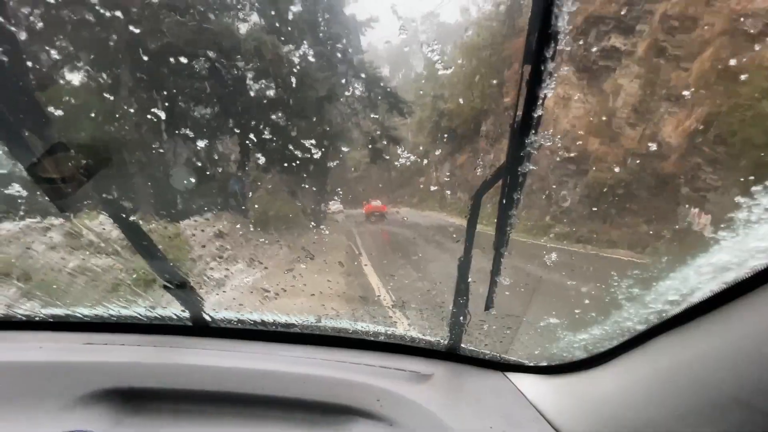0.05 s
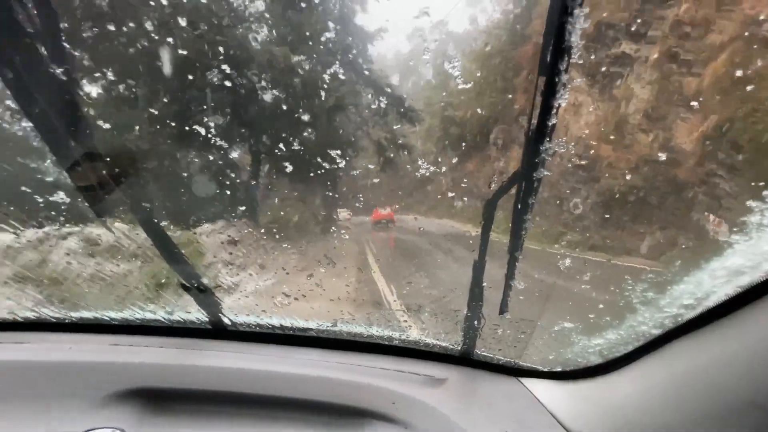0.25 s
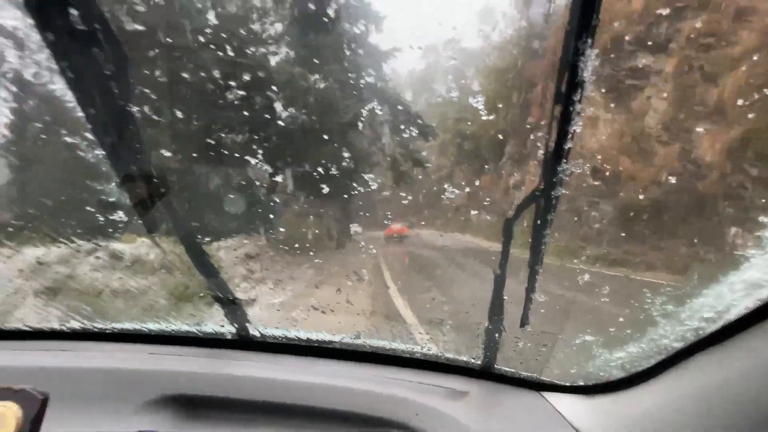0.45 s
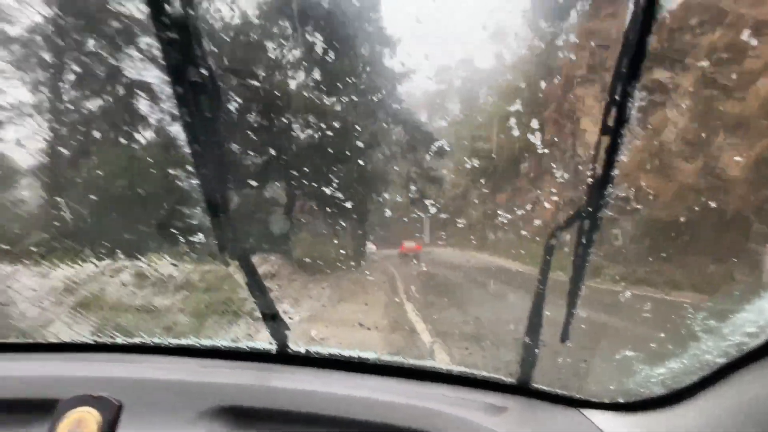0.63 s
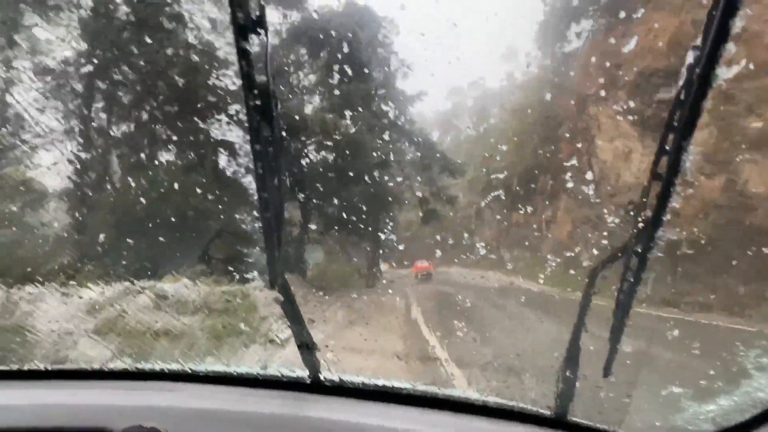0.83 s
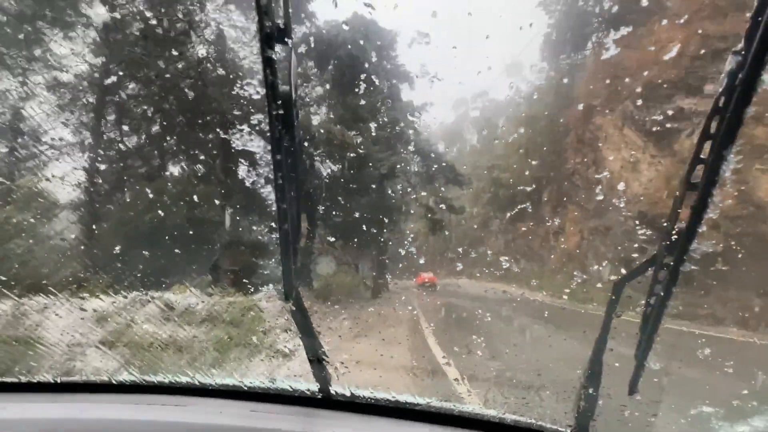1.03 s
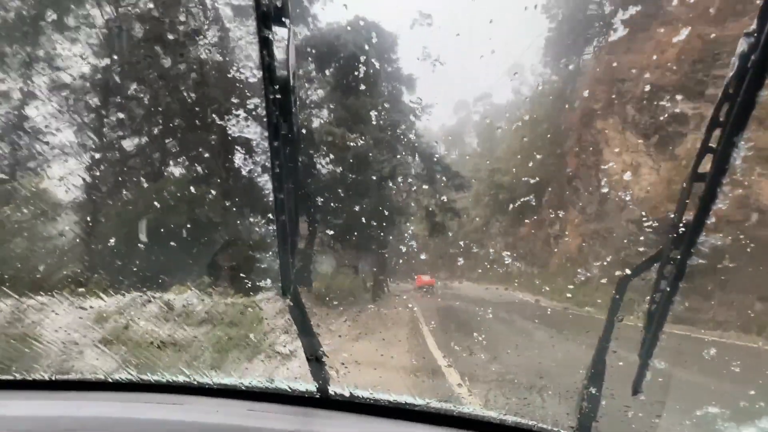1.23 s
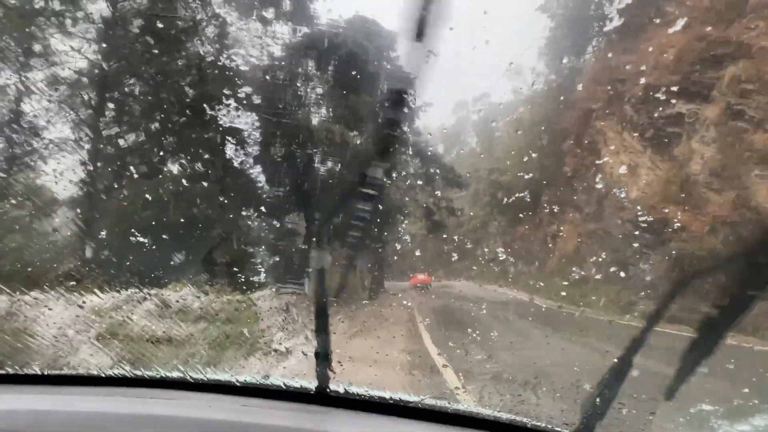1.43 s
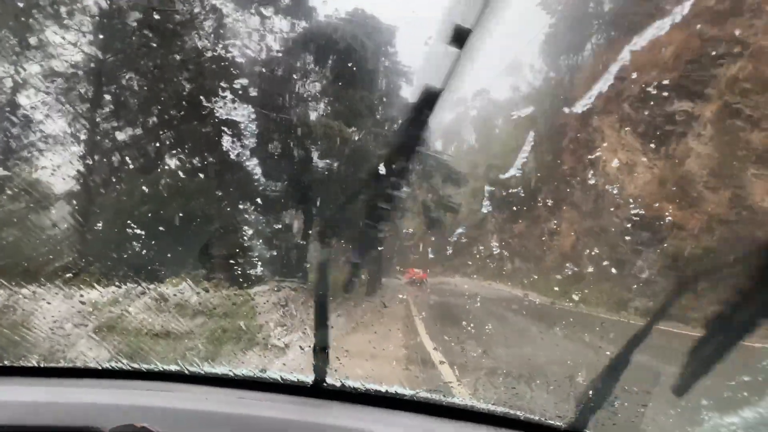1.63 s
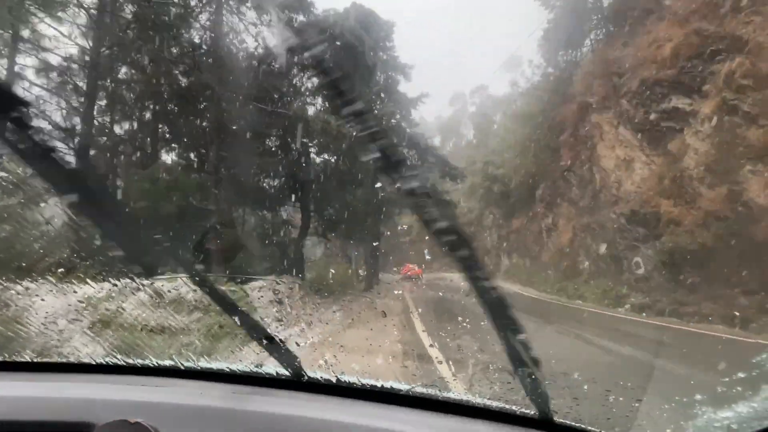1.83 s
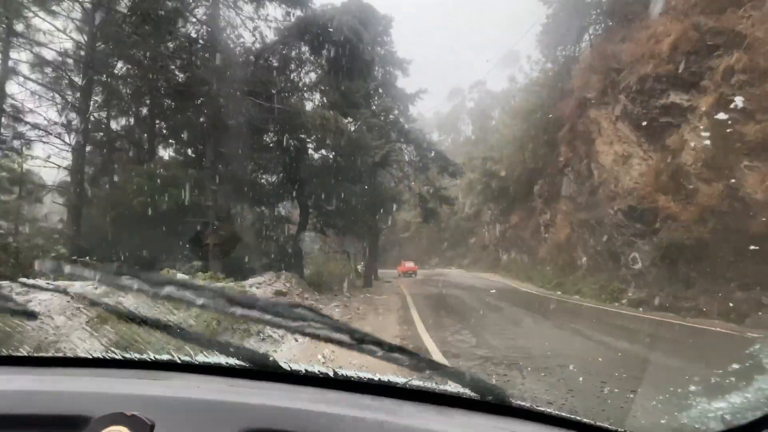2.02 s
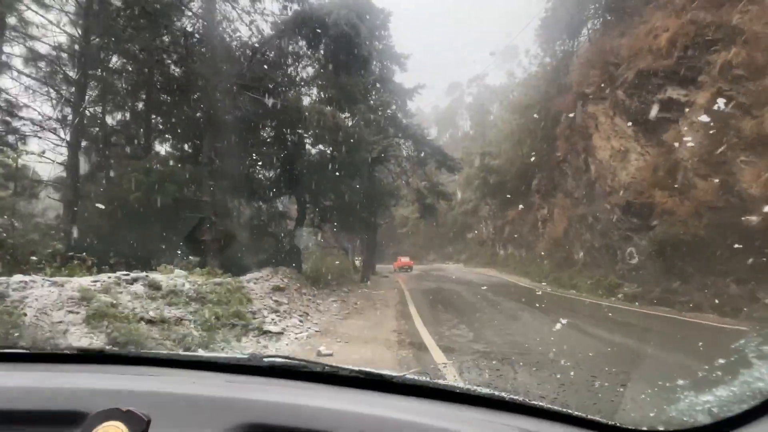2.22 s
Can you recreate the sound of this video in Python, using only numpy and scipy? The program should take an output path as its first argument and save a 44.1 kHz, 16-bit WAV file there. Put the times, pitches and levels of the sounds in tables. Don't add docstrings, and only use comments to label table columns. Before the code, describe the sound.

Windshield wipers heard from the front seat: a low engine hum and faint ticks, then clattering knocks as the wipers start, a brief motor whine with soft hiss, and a heavy double thump; close stereo microphone.

```python
import sys
import numpy as np
from scipy import signal
from scipy.fft import rfft, irfft, next_fast_len
from scipy.io import wavfile

SR = 44100
rng = np.random.default_rng(int(sys.argv[2]) if len(sys.argv) > 2 else 0)


def dump_mix(stems):
    frames = np.atleast_2d(stems).T
    limited = np.clip(frames, -1, 1)
    pcm = np.round(limited * 32767).astype(np.int16)
    wavfile.write(sys.argv[1], SR, pcm)


def makeup_ratio(level_db):
    decades = np.asarray(level_db, float) / 20
    return 10 ** decades


N = 100062

# start_s, level_db
ROAD_LEVEL = [
    (0, -37.5),
    (.07, -52.5),
    (.25, -63.5),
    (.6, -59.5),
    (.9, -63.5),
    (1.2, -65.5),
    (2.27, -51),
]
# band_hz, density_db (per Hz)
ROAD_COLOUR = [(20, -14), (50, -3), (130, -6), (190, -9), (250, -23), (400, -25), (800, -42), (4500, -75)]
# band_hz, density_db (per Hz)
HISS_COLOUR = [(300, -30), (600, -6), (1200, -4), (2600, -2), (4000, -8), (7500, -14), (11500, -5),
               (14000, -20)]
# start_s, firing_rate_hz, level_db
ENGINE_HUM = [(0, 63, -64), (.05, 63, -51), (.18, 63, -46), (.22, 63, -53), (.42, 63.5, -52),
              (.55, 63, -58), (.6, 61, -70), (.7, 64, -52), (.81, 64, -59), (.86, 64, -50), (1.13, 63, -56),
              (1.235, 63, -70), (1.29, 63, -55), (2.27, 62, -57)]
# firing_rate_multiple (ratio), level_db
ENGINE_ORDERS = [(.5, -11.5), (1, 1), (2, -16.5), (3, -23.5)]
# start_s, level_db, centre_hz, treble_db, decay_t60_s
TICK_EVENTS = [(0, -67, 1310, 2.5, 0.14), (.285, -57, 1080, -5, 0.059), (0.305, -67.5, 6050, -0.5, 0.27),
               (.449, -44.5, 963, -23.5, 0.06), (.448, -53, 11300, -7, 0.045),
               (0.454, -65.5, 2140, -3, 0.16), (.467, -57.5, 11000, -12, .06),
               (.515, -61.5, 840, -11.5, 0.048), (0.599, -60.5, 1990, -11.5, 0.12),
               (0.796, -62.5, 11700, -23, 0.024), (0.84, -63, 744, -43, 0.075),
               (1.051, -66, 1070, -11, 0.14), (1.053, -75, 7000, -9, 0.13), (1.084, -43, 1056, -42, 0.023),
               (1.085, -51.5, 1680, -50, 0.034), (1.085, -51.5, 2260, -46.5, 0.02),
               (1.339, -61, 1180, -10, 0.11), (1.374, -53.5, 6140, 6.5, 0.081),
               (1.379, -41, 2480, -1.5, 0.05), (1.384, -38, 855, -20, 0.065),
               (1.382, -37.5, 1440, -3, 0.059), (1.457, -39.5, 1620, -24, 0.041),
               (1.464, -35, 886, -4.5, 0.1), (1.4705, -25.5, 1240, -2.5, 0.039),
               (1.474, -41.5, 2710, 7.5, 0.066), (1.518, -50, 6200, 4.5, 0.052),
               (1.588, -40.5, 11500, -6, 0.084), (1.565, -54, 3040, -6, 0.047),
               (1.751, -60.5, 11700, -2, 0.097), (1.775, -54, 1130, -3, 0.05),
               (1.816, -55.5, 11900, -1.5, 0.13), (1.908, -46, 2820, -3.5, 0.038),
               (1.909, -48, 4570, -9, .05), (1.914, -48.5, 1570, -11, 0.075),
               (2.212, -40.5, 1140, -10.5, 0.066), (2.217, -40, 2040, -30, 0.05),
               (2.228, -44.5, 3600, 1, 0.06), (2.239, -47, 2700, -14, 0.049), (2.262, -40, 1300, -14, .05)]
# mode_hz, level_db (when struck as treble)
TRIM_MODES = [(830, -9), (1150, -9), (1280, -9), (1590, -9), (2130, -19), (2430, -21), (2720, -25),
              (3140, -16), (3900, -14), (5040, -11.5), (6200, -41), (7070, -20), (8300, -16), (10200, -16)]
# start_s, peak_db, pitch_hz, decay_t60_s
KNOCK_EVENTS = [(0, -43.5, 139, 0.16), (0, -57.5, 299.5, 0.39), (0.455, -33, 371, 0.043),
                (0.469, -42.5, 116, 0.17), (.6, -62.5, 422, 0.13), (.605, -55.5, 134, .2),
                (.468, -41.5, 313, 0.1), (0.468, -41.5, 213, 0.12), (1.089, -42, 303, 0.021),
                (1.089, -48, 124, 0.24), (1.343, -51, 416, 0.25), (1.376, -34, 480, .1),
                (1.382, -30, 105.7, 0.21), (1.456, -28.5, 103.7, 0.19), (1.383, -17.5, 285.6, 0.059),
                (1.385, -25.5, 546, 0.043), (1.399, -18.5, 194.7, .13), (1.444, -22, 189, 0.18),
                (1.469, -17.5, 440, 0.043), (1.481, -21.5, 302.5, 0.082), (1.52, -5, 185, 0.021),
                (1.542, -17.5, 243, 0.087), (1.56, -17, 163.3, 0.12), (1.549, -32.5, 55.6, 1),
                (1.616, -23.5, 137.4, 0.14), (1.632, -33, 175, 0.51), (1.575, -25.5, 292.3, 0.15),
                (1.599, -30.5, 250, 0.086), (1.66, -38, 292, 0.11), (2.03, -34.5, 196.7, 0.14),
                (2.069, -35.5, 118.5, 0.42), (2.111, -33.5, 183, 0.25), (2.156, -35, 122, 0.78),
                (2.217, -14, 203, 0.09), (2.231, -4, 135, 0.045), (2.22, -30, 760, 0.063),
                (2.231, -31, 305, 0.18), (2.239, -3.5, 155, 0.076), (2.257, -20, 148, 0.2)]
# start_s, commutator_hz, level_db
MOTOR_WHINE = [
    (1.5, 520, -53),
    (1.562, 572, -50),
    (1.62, 548, -52),
    (1.675, 432, -50),
    (1.72, 443, -45),
    (1.95, 440, -46),
    (2.034, 478, -54),
    (2.156, 556, -53),
    (2.269, 572, -51),
]
# shaft_speed_multiple (ratio), level_db
SHAFT_ORDERS = [(1, -8), (4, -6), (5, -8), (24, -26), (36, -27), (10, -12), (11, -2), (12, 2.5)]
# start_s, level_db
LINKAGE_LOAD = [
    (1.37, -110),
    (1.385, -44),
    (1.44, -44),
    (1.55, -38),
    (1.66, -42),
    (1.75, -45),
    (2.0, -45),
    (2.15, -42),
    (2.27, -40),
]
# band_hz, density_db (per Hz)
GEAR_LOW_COLOUR = [(15, -37), (25, -16), (51, 6.5), (81, -4), (109, 3), (182, 4.5), (309, -3.5), (420, 0),
                   (550, -34), (920, -120)]
GEAR_HIGH_COLOUR = [(310, -23), (520, 1), (935, -2), (1390, -2), (1820, -10), (2500, -7), (7440, -29),
                    (11500, -25.5), (13600, -46)]
# band_hz, likeness (0-1)
PORT_LIKENESS = [(100, .95), (260, .8), (450, .15), (8500, .35), (10300, .87), (13000, .98)]
# band_hz, lead_rad
PORT_LEAD = [(100, .05), (400, .4), (1000, 0), (4700, 0), (5600, 3.1), (6300, 0), (7300, 0), (8100, 3.6),
             (9000, 4), (10200, 2.6), (12900, 0)]
# band_hz, balance_db
PORT_BALANCE = [(60, 4.5), (200, 2), (600, 5), (2500, 0), (6000, 5), (7300, 4), (9000, -5), (10500, 1)]
# band_hz, gain_db
TREBLE_DIPS = [(4700, -1.5), (5450, -6.5), (6100, 0), (6900, -1), (7600, -6.5), (8300, -0.5)]

HISS_DB, HUM_FLUTTER_DB = -74, 1
TICK_OCTAVES, TICK_RISE_S = 0.67, 0.00078
TREBLE_HZ, TREBLE_DULL_HZ = 1550, 4470
TAIL_DB, TAIL_STRETCH, TAIL_RISE_S = -8.5, 2.85, 0.0018
RING_DB, BODY_NOISE_DB = 3, -4
MODE_FALL_DB, MODE_OCTAVES = 7, .3
HIGH_LOSS_DB_PER_CYCLE, CHATTER_S = .03, .003
KNOCK_RISE_CYCLES, KNOCK_RATTLE_DB = .5, -14
COMMUTATOR_SLOTS, MOTOR_ON_S, MOTOR_SPIN_UP_S = 12, 1.48, 0.026
MOTOR_FLUTTER_DB, MOTOR_JITTER = 2.3, .013
GEAR_HIGH_DB, GEAR_HIGH_FOLLOWS = -58, 0.87
BODY_LAG_S = .015
MIC_LOW_HZ, MIC_HIGH_HZ = 35.5, 12330


def rms_one(x):
    return x / np.sqrt(np.mean(x ** 2) + 1e-20)


def in_time(rows):
    s, *columns = np.transpose(rows)
    return [np.interp(np.arange(N) / SR, s, c) for c in columns]


def at_hz(points, hz):
    point_hz, value = np.transpose(points)
    return np.interp(np.log(hz), np.log(point_hz), value)


def drift(rate):
    r = np.exp(-80 * np.pi * rate / SR)
    slow = signal.lfilter([1], [1, -2 * r, r * r], rng.standard_normal(N // 40 + 2002))[2000:]
    return np.interp(np.arange(N) / 40, np.arange(len(slow)), rms_one(slow))


def bandpass(order, low_hz, high_hz):
    return signal.butter(order, [low_hz, high_hz], "band", fs=SR, output="sos")


def banded_noise(spectrum, patchy_db):
    out, together = 0, drift(6.0)
    edges = 22 * 2 ** np.arange(0, 9.7, .4)
    white = rng.standard_normal((2, 2, N))
    for k, (low, high) in enumerate(zip(edges, edges[1:])):
        db = at_hz(spectrum, np.sqrt(low * high))
        flicker = patchy_db * (.4 * together + drift(25.0))
        if db > -70:
            out = out + makeup_ratio(db + flicker) * signal.sosfilt(bandpass(2, low, high), white[k % 2])
    return rms_one(out)


def diffuse(x):
    lags = (rng.uniform(0.0018, 0.0108, 4) * SR).astype(int)
    echoes = [(-1) ** k * np.pad(x, (lag, 0))[:N] for k, lag in enumerate(lags)]
    return np.array([x, sum(echoes) / 2])


def lines(hz, orders, flutter_db):
    turns = 2 * np.pi * np.cumsum(hz) / SR
    out = 0
    for k, db in orders:
        level = np.sqrt(2) * makeup_ratio(db + flutter_db * drift(9.6))
        out = out + level * np.sin(k * turns + rng.uniform(0, 2 * np.pi))
    return out


def strike(t60, rise_s, size=SR // 2):
    t = np.arange(size) / SR
    return t, (1 - np.exp(-t / rise_s)) * makeup_ratio(-60 * t / t60)


def cabin():
    road_db, = in_time(ROAD_LEVEL)
    hiss = makeup_ratio(HISS_DB) * banded_noise(HISS_COLOUR, patchy_db=.5)
    return makeup_ratio(road_db) * banded_noise(ROAD_COLOUR, patchy_db=-1.0) + hiss


def engine():
    firing_hz, db = in_time(ENGINE_HUM)
    return diffuse(makeup_ratio(db) * lines(firing_hz, ENGINE_ORDERS, HUM_FLUTTER_DB))


def ticks():
    out = np.zeros((2, N + SR))
    crackle_filter = np.vstack([signal.butter(2, TREBLE_HZ, "high", fs=SR, output="sos"),
                                signal.butter(1, TREBLE_DULL_HZ, fs=SR, output="sos")])
    mode_hz, mode_db = np.transpose(TRIM_MODES)[:, :, None]
    for s, db, hz, treble_db, t60 in TICK_EVENTS:
        t, blow = strike(t60, TICK_RISE_S, size=SR // 3)
        tail = makeup_ratio(TAIL_DB) * strike(TAIL_STRETCH * t60, TAIL_RISE_S, size=SR // 3)[1]
        burst = (blow + tail) * rng.standard_normal((2, 2, len(t)))

        octaves_off = np.log2(mode_hz / hz)
        level = makeup_ratio(-MODE_FALL_DB * (octaves_off / MODE_OCTAVES) ** 2)
        level = level + makeup_ratio(treble_db + mode_db) * (mode_hz > TREBLE_HZ)
        late = np.maximum(t - rng.uniform(0, CHATTER_S, mode_hz.shape), 0)
        level = level * makeup_ratio(rng.normal(0, 1.07, mode_hz.shape) - HIGH_LOSS_DB_PER_CYCLE * mode_hz * late)
        phases = rng.uniform(0, 2 * np.pi, (2, *mode_hz.shape))
        modes = level * np.interp(late, t, blow) * np.sin(2 * np.pi * mode_hz * t + phases)

        body_filter = bandpass(3, hz * 2 ** -TICK_OCTAVES, hz * 2 ** TICK_OCTAVES)
        body = signal.sosfilt(body_filter, burst[0]) * np.sqrt(SR / 4 / hz)
        crackle = 2 * signal.sosfilt(crackle_filter, burst[1])
        sound = makeup_ratio(RING_DB) * modes.sum(axis=1) + makeup_ratio(BODY_NOISE_DB) * body + makeup_ratio(treble_db) * crackle
        start = int(s * SR)
        out[:, start:start + len(t)] += makeup_ratio(db) * sound
    return out[:, :N]


def knocks():
    out = np.zeros(N + SR)
    for s, db, hz, t60 in KNOCK_EVENTS:
        t, shape = strike(t60, KNOCK_RISE_CYCLES / hz)
        noise = signal.sosfilt(bandpass(2, hz / 2, hz * 2), rng.standard_normal(len(t)))
        rattle = makeup_ratio(KNOCK_RATTLE_DB) * rms_one(noise)
        start = int(s * SR)
        out[start:start + len(t)] += makeup_ratio(db) * shape * (np.sin(2 * np.pi * hz * t) + rattle)
    return diffuse(out[:N])


def wiper_motor():
    commutator_hz, whine_db = in_time(MOTOR_WHINE)
    load_db, = in_time(LINKAGE_LOAD)
    on = np.clip((np.arange(N) / SR - MOTOR_ON_S) / MOTOR_SPIN_UP_S, 0, 1)
    shaft_hz = commutator_hz / COMMUTATOR_SLOTS * (1 + MOTOR_JITTER * drift(27.8))
    whine = diffuse(on * makeup_ratio(whine_db) * lines(shaft_hz, SHAFT_ORDERS, MOTOR_FLUTTER_DB))

    lag = np.exp(-1 / (BODY_LAG_S * SR))
    body_level = signal.lfilter([1 - lag], [1, -lag], makeup_ratio(load_db))
    low = body_level * banded_noise(GEAR_LOW_COLOUR, patchy_db=-0.5)
    bright_db = GEAR_HIGH_DB + np.minimum(load_db + 83, 0) + GEAR_HIGH_FOLLOWS * (load_db + 47.5)
    high = makeup_ratio(bright_db) * banded_noise(GEAR_HIGH_COLOUR, patchy_db=1.5)
    return whine + low + high


def ports(direct, scattered):
    size = next_fast_len(N + 4096)
    hz = np.maximum(np.arange(size // 2 + 1) * SR / size, 1)
    alike = np.clip(at_hz(PORT_LIKENESS, hz), 0, 1)
    lead = np.exp(.5j * at_hz(PORT_LEAD, hz))
    tilt = makeup_ratio(at_hz(PORT_BALANCE, hz) / 2)
    dips = makeup_ratio(at_hz(TREBLE_DIPS, hz))
    shared = dips * np.sqrt((1 + alike) / 2) * rfft(direct, size)
    opposed = dips * np.sqrt((1 - alike) / 2) * rfft(scattered, size)
    left = (shared + opposed) * lead * tilt
    right = (shared - opposed) / lead / tilt
    return irfft(np.array([left, right]), size)[:, :N]


def scene():
    direct, scattered = engine() + cabin() + wiper_motor() + ticks() + knocks()
    return ports(direct, scattered)


def top_cut(x):
    return signal.sosfilt(signal.butter(12, 15600, fs=SR, output="sos"), x)


def record(dry):
    mic = np.vstack([signal.butter(2, MIC_LOW_HZ, "high", fs=SR, output="sos"),
                     signal.butter(8, MIC_HIGH_HZ, fs=SR, output="sos")])
    return top_cut(signal.sosfilt(mic, dry))


dry = scene()
out = record(dry)
dump_mix(out)
```